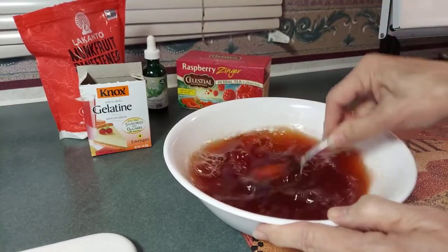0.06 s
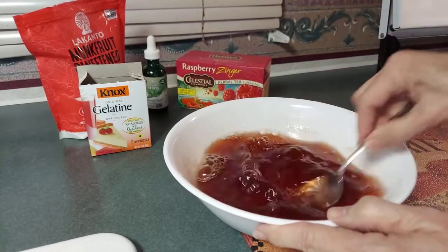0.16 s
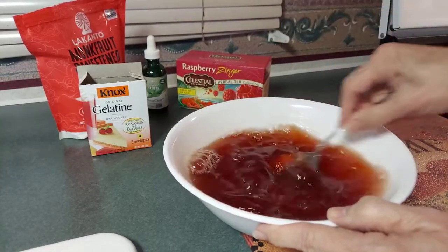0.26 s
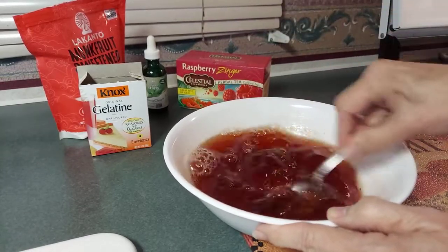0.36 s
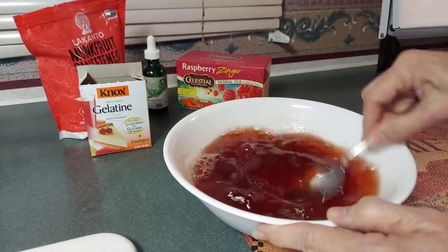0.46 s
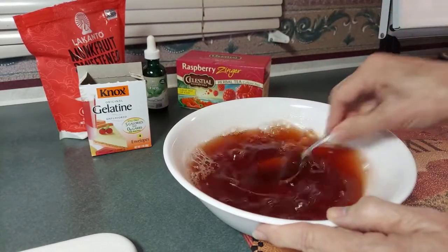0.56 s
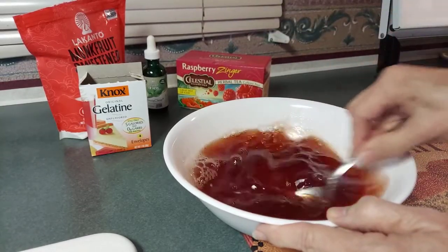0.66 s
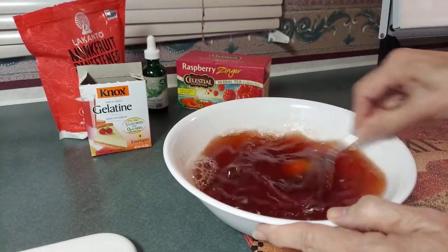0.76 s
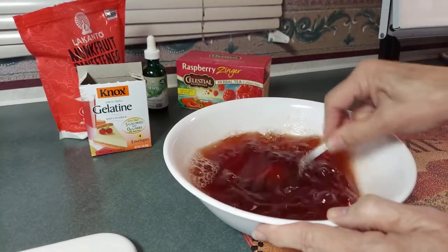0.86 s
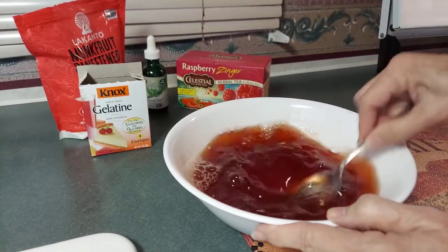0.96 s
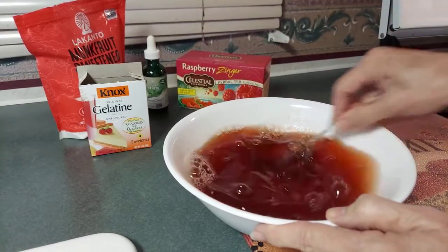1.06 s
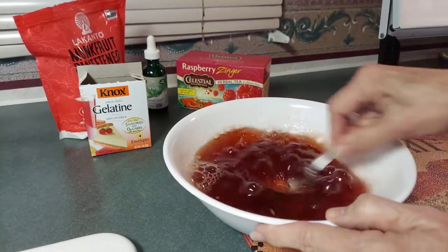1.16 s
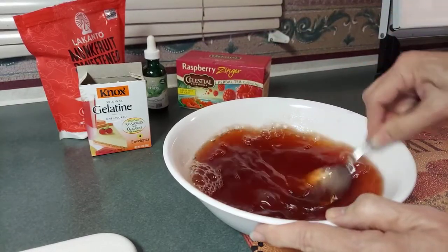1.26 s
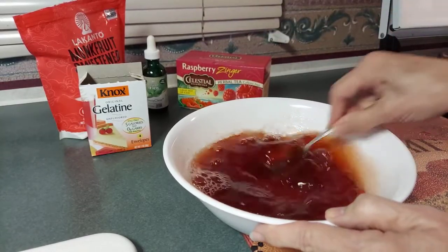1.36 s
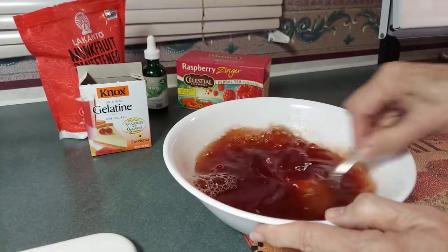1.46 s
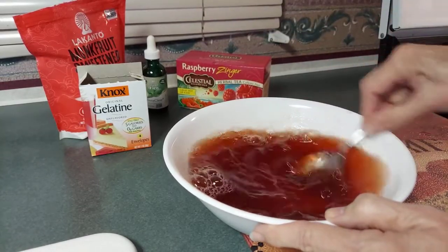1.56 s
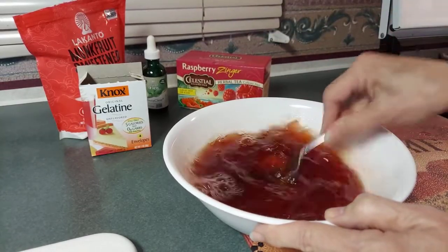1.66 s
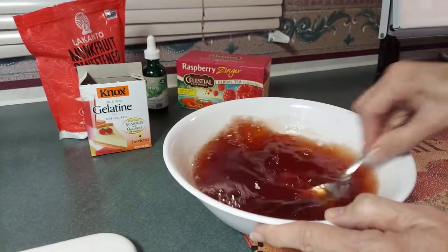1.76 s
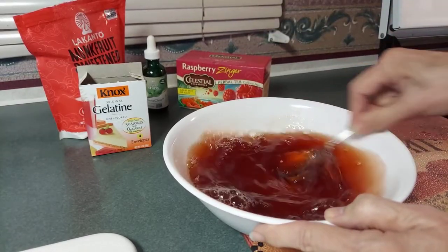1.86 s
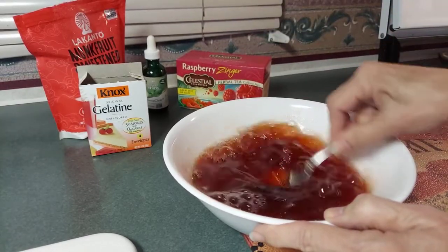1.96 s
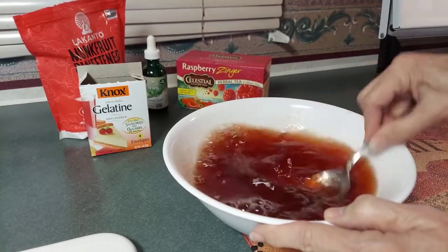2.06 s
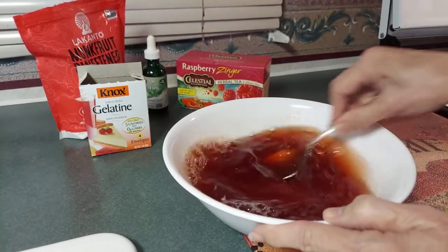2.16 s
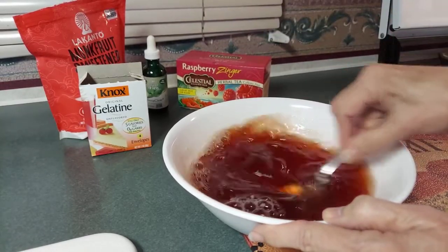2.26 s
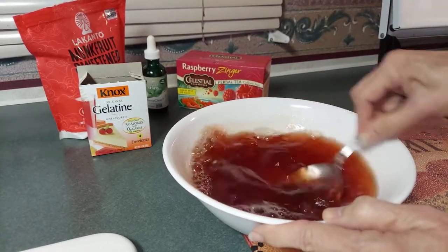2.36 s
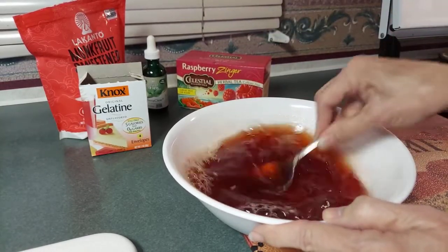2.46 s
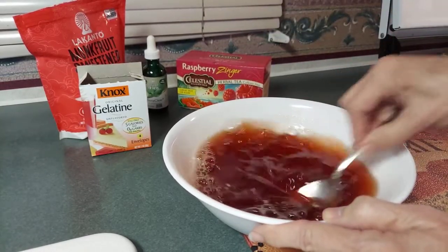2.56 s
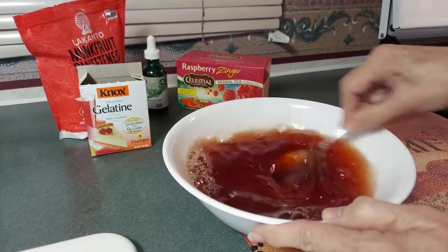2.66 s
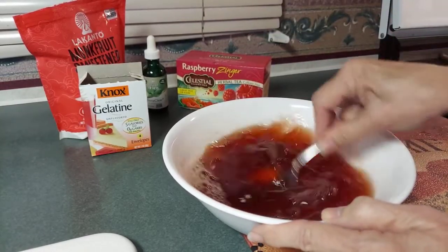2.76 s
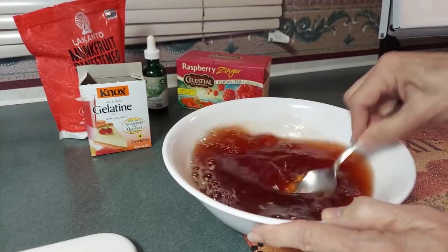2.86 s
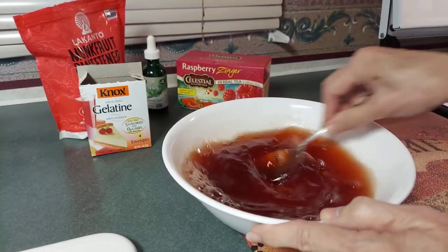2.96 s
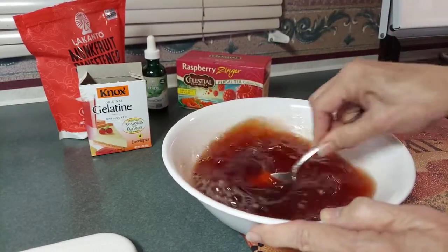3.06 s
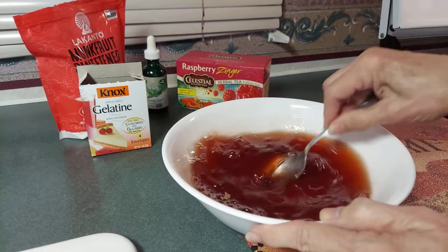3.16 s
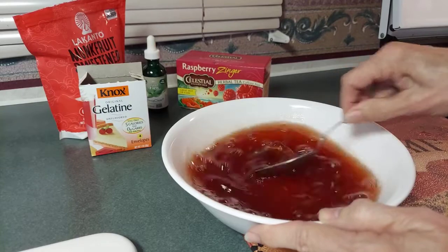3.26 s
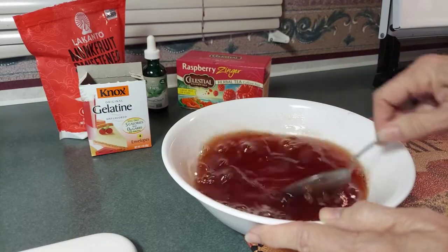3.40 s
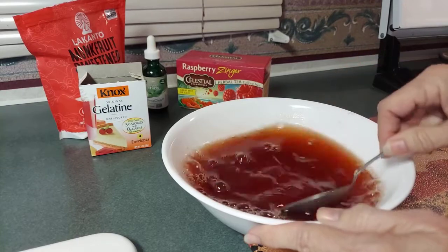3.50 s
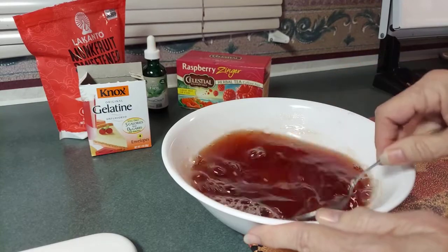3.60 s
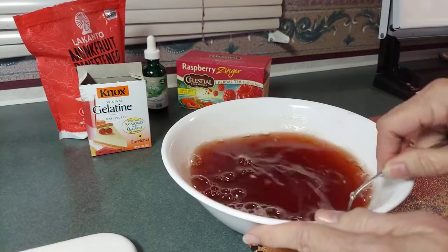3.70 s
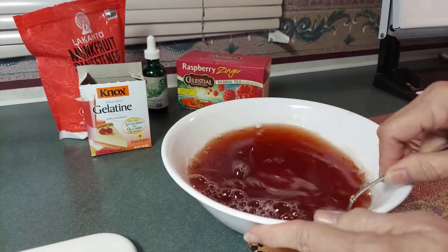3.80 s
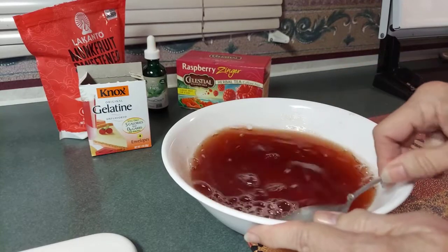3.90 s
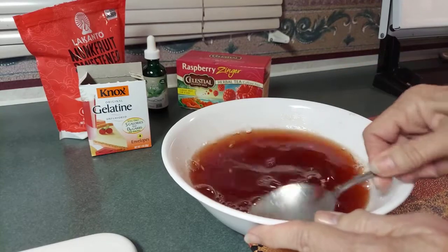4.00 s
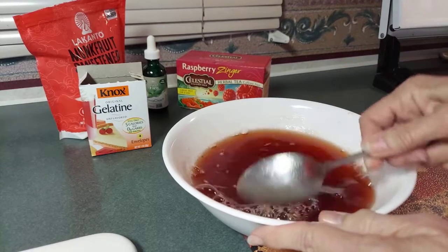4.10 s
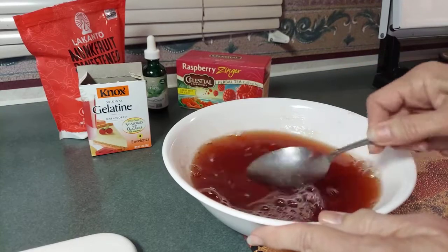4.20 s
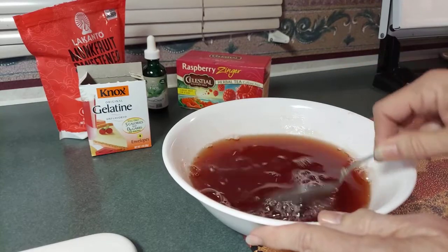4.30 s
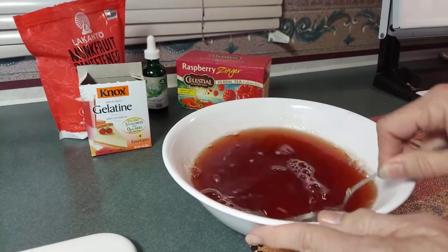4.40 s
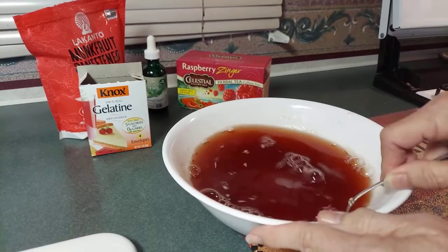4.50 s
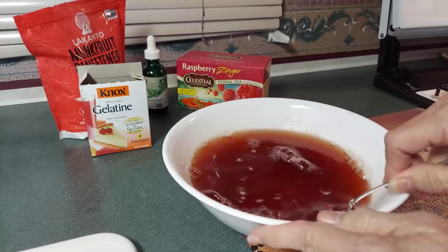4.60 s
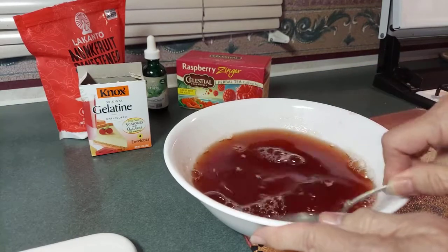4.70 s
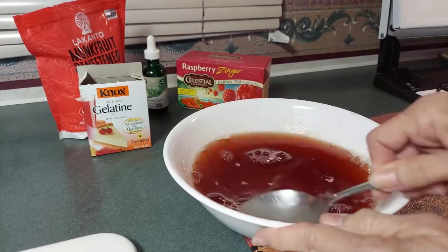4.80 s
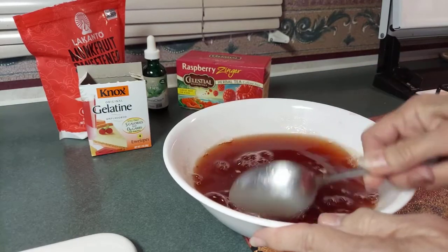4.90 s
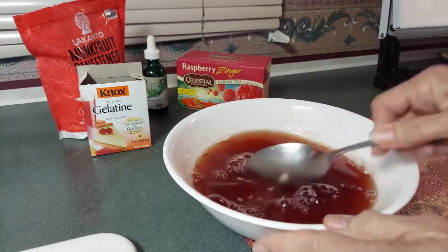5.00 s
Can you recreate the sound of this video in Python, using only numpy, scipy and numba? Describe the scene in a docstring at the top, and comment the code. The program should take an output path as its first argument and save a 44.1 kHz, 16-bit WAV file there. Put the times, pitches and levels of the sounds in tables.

```python
"""A metal spoon stirs liquid briskly in a hand-held ceramic bowl on a kitchen counter, then skims it gently.
Each sweep is grainy friction that rings the liquid-damped modes of the bowl; sharp onsets strike the same modes.
Gliding tones are trapped bubbles; filtered noise bursts are spray and droplets.
The bowl rocks with dull juddering thuds; mains hum and a faint cricket lie behind it in a small room."""
import sys
import numpy as np
from scipy import signal
from scipy.fft import rfft, irfft
from scipy.io import wavfile
from scipy.ndimage import uniform_filter1d
from numba import njit

SR = 44100
rng = np.random.default_rng(int(sys.argv[2]) if len(sys.argv) > 2 else 0)


def output_pcm(signal):
    """Save a mono or channel-first signal as 16-bit PCM at the path in sys.argv[1].

    Samples are clipped to [-1, 1] before scaling.
    """
    pcm = np.clip(np.atleast_2d(signal).T, -1, 1) * 32767
    wavfile.write(sys.argv[1], SR, np.round(pcm).astype(np.int16))


N = 222521
TIME = np.arange(N) / SR
# Sign of the left and the right side.
SIDES = np.array([[1], [-1]])


def undb(db):
    """Decibels to gain."""
    return 10 ** (np.asarray(db) / 20)


def unit(x):
    """Scale to rms 1."""
    return x / np.sqrt(np.mean(x ** 2))


def add(track, s, sound):
    """Mix a sound into a track at time s."""
    i = max(int(s * SR), 0)
    track[i:i + len(sound)] += sound[:max(N - i, 0)]


def colour(x, points, size=8192):
    """Causal minimum-phase filter through (Hz, dB) points, interpolated over log frequency."""
    hz, db = np.transpose(points)
    bin_hz = np.fft.rfftfreq(size, 1 / SR)
    log_gain = np.log(undb(np.interp(np.log(bin_hz + 1), np.log(hz), db)))
    fold = np.r_[1, np.full(size // 2 - 1, 2), np.zeros(size // 2)]
    cepstrum = irfft(log_gain) * fold
    return signal.fftconvolve(x, irfft(np.exp(rfft(cepstrum))))[:len(x)]


def walk(rate_hz):
    """Smooth random wander around 0, spread near 1."""
    k = int(SR / rate_hz)
    steps = np.repeat(rng.standard_normal(N // k + 1), k)
    return uniform_filter1d(steps, k)[:N]


def swell(s, rise_s, fall_s, edge=1.14):
    """A push that builds up to time s and lets go."""
    d = TIME - s
    u = np.abs(d / np.where(d < 0, rise_s, fall_s))
    near, push = u < 5, np.zeros(N)
    push[near] = np.exp(-u[near] ** edge)
    return push


def grains(rate_hz, spread_db):
    """Random tiny impacts of uneven size and either sign, rms 1."""
    size = undb(spread_db * np.minimum(rng.exponential(size=N), 4))
    struck = rng.random(N) < rate_hz / SR
    return unit(struck * size * rng.choice([-1, 1], N))


def burst(decay_s, size=2048):
    """A spit of spray: a short dying hiss of unit energy."""
    spray = rng.standard_normal(size) * np.exp(-np.arange(size) / SR / decay_s)
    return spray / np.linalg.norm(spray)


@njit
def resonate(x, hz, width_hz):
    """State-variable band-pass with a moving centre, gain 1 at the centre."""
    y, band, low = np.empty(len(x)), 0., 0.
    for i in range(len(x)):
        g, k = np.tan(np.pi * hz[i] / SR), width_hz / hz[i]
        v = (band + g * (x[i] + 1e-18 - low)) / (1 + g * (g + k))
        band, low, y[i] = 2 * v - band, low + 2 * g * v, k * v
    return y


def upper(hz, split_hz=1400):
    """How far a mode belongs to the bright upper group, 0-1."""
    return 1 / (1 + (split_hz / hz) ** 8)


def stirring(front_db=0.5, flank_db=-6.5):
    """The near wall and the flanks vibrate apart; the flanks reach the two sides in opposite phase."""
    front = scraping() + splashing() + hollow()
    flank = scraping() + splashing()
    return undb(front_db) * front + undb(flank_db) * SIDES * flank


# Turns of the spoon, each a back-swing and then a push. Each row: time of the push in seconds,
# back-swing level in dB, push level in dB, spray of the back-swing in dB, spray of the push in dB.
TURNS = [(.04, -56, -50, -69, -66.5), (.275, -50, -51, -71, -65.5), (0.543, -50, -48, -66.5, -70.5),
         (.807, -52.5, -48.5, -70, -73), (1.068, -52.5, -44, -70.5, -69), (1.346, -46.5, -40.5, -66, -68),
         (1.608, -43.5, -41, -70, -59.5), (1.896, -46.5, -43, -59.5, -68.5),
         (2.162, -47, -44.5, -66, -64.5), (2.428, -48.5, -51.5, -68, -64),
         (2.687, -54.5, -47.5, -70, -63.5), (2.956, -50.5, -50.5, -66, -62.5),
         (3.194, -57, -60.5, -77, -73)]
BACK_LEAD_S = 0.14  # the back-swing comes this long before the push
# the push drags low through the liquid and is dull; the back-swing runs high along the wall and is bright
PUSH_RISE_S, PUSH_FALL_S, PUSH_BRIGHT_DB = 0.028, 0.026, -3
BACK_RISE_S, BACK_FALL_S, BACK_BRIGHT_DB = 0.037, 0.026, 6.5
DULLING_DB_PER_DB, USUAL_DB = 0.34, -46.5  # pressing harder than usual favours the low modes


def sweeps():
    """Two sweeps to a turn: rows of (s, rise s, fall s, level dB, brightness dB, spray dB); force sets the colour."""
    rows = []
    for s, back_db, push_db, back_spray_db, push_spray_db in TURNS:
        back = (s - BACK_LEAD_S, BACK_RISE_S, BACK_FALL_S, back_db, BACK_BRIGHT_DB, back_spray_db)
        push = (s, PUSH_RISE_S, PUSH_FALL_S, push_db, PUSH_BRIGHT_DB, push_spray_db)
        for when, rise, fall, db, bright_db, spray_db in (back, push):
            force_bright_db = bright_db - DULLING_DB_PER_DB * (db - USUAL_DB)
            rows.append((when, rise, fall, db, force_bright_db, spray_db))
    return [row for row in rows if row[0] > 0]


def turn_angle():
    """Where the spoon is in its circle, in radians; each push is a whole turn."""
    return 2 * np.pi * np.interp(TIME, np.transpose(TURNS)[0], np.arange(len(TURNS)))


# Modes of the filled bowl. Each row: frequency in Hz, width in Hz before the player's ring factor, level in dB.
BOWL_MODES = [(828, 35.2, 5), (932.5, 56.7, -1.5), (1054, 55, 3), (1147.3, 58, 5), (1200.8, 23, 4),
              (1400, 56, -7), (1504, 36, 2), (1677, 130, -4.5), (1744, 26, 0), (1880, 120, -4.5),
              (2040, 90, -12.5), (2854, 60, -17.5), (2910, 85, -10), (3048, 50, -9), (3168, 134, -3.5),
              (3376, 150, -10), (3644, 390, -20), (4480, 734, -29), (5510, 92, -36.5), (5756, 170, -23),
              (7070, 170, -37), (8590, 400, -33.5)]
# Modes the push favours over the back-swing, as they touch different parts of the wall.
# Each row: frequency in Hz, favour in dB.
PUSH_FAVOUR = [(843, 6), (1030, 2.5), (1190, -0.5), (1600, -5), (1900, 5), (2800, -5.5), (3200, 0),
               (3420, 7.5), (4200, -12), (5750, 9.5), (8400, 8)]


def scraping(level_db=-2.0, slosh=0.0095, swirl=0.027, lift=0.035, sag=.03, ring=0.8, place_db=2,
             climb_db=5, climb_s=0.018, rest_db=-74, flicker_db=2.0):
    """Friction rings the bowl; the liquid circles once a turn, weighs low modes down at the push, bends upper ones."""
    strokes = sweeps()
    pushes = np.array([swell(s, rise, fall) * undb(db) for s, rise, fall, db, _, _ in strokes]) ** 2
    peak_s, _, _, _, bright_db, _ = np.transpose(strokes)
    resting = undb(rest_db) * (TIME < peak_s[-1])
    swing, pushing = np.sin(turn_angle()), np.cos(turn_angle())
    favour_hz, favour_db = np.transpose(PUSH_FAVOUR)
    # the spoon climbs the wall during a sweep, so the ring shifts from the low modes to the high ones
    current_peak_s = peak_s @ pushes / (pushes.sum(axis=0) + 1e-30)
    height = np.tanh((TIME - current_peak_s) / climb_s)
    friction, depth = grains(rate_hz=1200, spread_db=4.0), walk(25)
    low_bend = lift * height * np.maximum(pushing, 0) + sag * (1 - pushing) / 2
    body, power = np.zeros(N), 0
    for k, (hz, width_hz, db) in enumerate(BOWL_MODES):
        high = upper(hz)
        weight_db = bright_db * high + place_db * rng.uniform(-2.75, 2.46, len(strokes))
        climb_tilt_db = climb_db * height * min(np.log2(hz / 1250), .5)
        tilt_db = climb_tilt_db + np.interp(hz, favour_hz, favour_db) * pushing
        force = np.sqrt(undb(2 * weight_db) @ pushes) * undb(tilt_db + flicker_db * walk(45)) + resting
        bend = slosh * (depth + walk(18)) + swirl * high * swing + (1 - high) * low_bend
        body += (-1) ** k * undb(db) * resonate(friction * force, hz * (1 + bend), ring * width_hz)
        # the low group alone sets the scale
        power += undb(2 * db) * np.pi * ring * width_hz / SR * (1 - high)
    return undb(level_db) * body / np.sqrt(power)


# Spray spectrum. Each row: frequency in Hz, gain in dB.
SPRAY_COLOUR = [(200, -12), (500, -26), (800, -2), (1800, -9), (2500, -11.5), (3300, -3), (4200, -3.5),
                (5000, -5.5), (5800, -3), (7000, -7.5), (10000, -11.5), (15000, -17.5)]


def splashing(level_db=2.0, spray_s=0.0022, patchy_db=2, band_db=4.0, rest_db=-78, count=7):
    """Each sweep tears the surface into crackle; drops of each size tick in their own band at their own moments."""
    force = np.sqrt(sum((swell(s, rise, fall) * undb(db)) ** 2 for s, rise, fall, _, _, db in sweeps()))
    force = force + undb(rest_db) * (TIME < TURNS[-1][0])
    edges_hz = np.geomspace(1200, 16000, count + 1)
    spray = 0
    for band_hz in zip(edges_hz, edges_hz[1:]):
        impacts = grains(rate_hz=540, spread_db=5.5) ** 2
        drops = signal.lfilter([1], [1, -np.exp(-1 / (SR * spray_s))], impacts)
        bandpass = signal.butter(2, band_hz, "bandpass", fs=SR, output="sos")
        crackle = signal.sosfilt(bandpass, np.sqrt(drops) * rng.standard_normal(N))
        spray = spray + crackle * undb(band_db * walk(45))
    return undb(level_db + patchy_db * walk(60)) * unit(colour(spray, SPRAY_COLOUR)) * force


def hollow(level_db=-5, centre_hz=1600, swing_octaves=.3, lag_rad=1.3, wander_octaves=0.077,
           width_hz=35, late_s=0.0071):
    """The hollow behind the spoon opens and closes once a turn, so its watery note glides down and up."""
    force = np.sqrt(sum((swell(s + late_s, rise, fall) * undb(db)) ** 2 for s, rise, fall, db, _, _ in sweeps()))
    octaves = swing_octaves * np.cos(turn_angle() - lag_rad) + wander_octaves * walk(22)
    note = resonate(grains(rate_hz=500, spread_db=2.5), centre_hz * 2 ** octaves, float(width_hz))
    return undb(level_db) * force * unit(note)


# Sharp onsets: knocks, scrapes that catch, and the crack of a plop.
# Each row: start in seconds, level in dB, brightness in dB, click in dB.
ONSETS = [(.135, -37.5, 2, -16), (0.166, -35.5, 8, -1), (.264, -36, -20, -25.5), (0.376, -36.5, -16, -29),
          (.412, -36, 11, 3.5), (0.515, -41, -35, -24), (1.182, -31.5, 9, -11), (1.255, -44.5, 0, 5),
          (1.326, -35, -8, -18), (1.4024, -36, 17.5, 5), (1.568, -20.5, -26, 3), (1.609, -29.5, 4.5, -27),
          (1.723, -37, 8.5, -5), (1.867, -34.5, 4, -29), (1.98, -36, 4, -5), (2.113, -48, -4, 5),
          (2.148, -33, -31, -18), (2.514, -44, 28, -20.5), (2.540, -18.5, 14, -2.5), (2.679, -30, -6, -17),
          (2.826, -23.5, 13, -2), (2.875, -38, 12.5, 2), (3.064, -24.5, 8, -7.5), (3.144, -38, 6, 4.5),
          (3.706, -54, -5.5, -21.5), (4.178, -60.5, -11.5, -23.5), (4.501, -58, -25, -19.5),
          (4.812, -52.5, -14, -22), (4.888, -61.5, 0, -14)]
# Click spectrum. Each row: frequency in Hz, gain in dB.
CLICK_COLOUR = [(300, -21.5), (1000, -4.5), (3000, 7.5), (5500, 2.5), (8000, -2.5), (11000, -9.5),
                (15000, -8.5)]


def sharp_onsets(ring=0.67, detune=0.0086, crack_s=0.005, crack_db=-3, size=8192):
    """Knocks, scrapes that catch, and the crack of a plop: a noise click, each with a short bowl ring."""
    out, blow = np.zeros(N), signal.unit_impulse(size)
    for s, db, bright_db, click_db in ONSETS:
        body = np.zeros(size)
        for k, (hz, width_hz, mode_db) in enumerate(BOWL_MODES):
            tuned_hz = np.full(size, hz * (1 + detune * rng.standard_normal()))
            gain = (-1) ** k * undb(mode_db + bright_db * upper(hz, split_hz=2170))
            body += gain * resonate(blow, tuned_hz, ring * width_hz)
        crack = colour(burst(crack_s, size=size), CLICK_COLOUR)
        crack = undb(click_db + crack_db) * crack / np.abs(crack).max()
        add(out, s, undb(db) * (body / np.abs(body).max() + crack))
    return out


def bubble(first_hz, last_hz, length_s, attack_cycles=1.8, damping=0.74, wobble=0.035, ragged=0.36,
           froth_db=-13, wobble_cycles=3):
    """An air pocket rings, wobbles every few cycles and glides as it nears the surface; froth roughens the tone."""
    u = np.arange(int(2 * length_s * SR)) / (length_s * SR)
    span, cycle = int(wobble_cycles * SR / first_hz), int(SR / first_hz)
    noise = rng.standard_normal((2, len(u)))
    shape, strength = uniform_filter1d(uniform_filter1d(noise, span), span) * np.sqrt(span)
    glide_hz = first_hz + (last_hz - first_hz) * np.minimum(u, 1.1)
    phase = 2 * np.pi * np.cumsum(glide_hz * (1 + wobble * shape)) / SR
    froth = uniform_filter1d(uniform_filter1d(rng.standard_normal(len(u)), 2 * cycle), cycle) * np.sqrt(2 * cycle)
    tone = np.sin(phase) * (1 + ragged * strength) + undb(froth_db) * froth * np.cos(phase)
    attack = 1 - np.exp(-(u * length_s * first_hz / attack_cycles) ** 2)
    return tone * attack * np.exp(-damping * u - 2 * u ** 5.9)


# The most prominent bubbles, from deep plops to a tiny foam pop. Each row: start in seconds,
# first pitch in Hz, rise in octaves, ring time in seconds, level in dB.
BUBBLES = [(0.054, 1280, 1.03, 0.029, -41.5), (0.186, 444, 0.93, 0.054, -53), (.234, 1510, 1.15, .016, -28),
           (0.24, 1750, 0.38, 0.011, -37), (.25, 2650, 0.44, 0.013, -45), (0.385, 2110, 0.36, 0.016, -39),
           (.389, 1014, -0.13, .022, -34.5), (.411, 2840, 0.04, .008, -35), (0.65, 1640, 0.17, 0.011, -37),
           (.701, 674, -0.061, 0.033, -42.5), (.7025, 2270, .12, 0.0065, -35.5),
           (.897, 1600, -0.021, 0.01, -38.5), (1.068, 1710, 0.32, 0.016, -41),
           (1.364, 3040, .043, 0.011, -32.5), (1.393, 1580, 0.85, .014, -37),
           (1.403, 2150, 0.12, 0.016, -33.5), (1.551, 3090, -0.36, .007, -36),
           (1.5666, 879, 0.43, 0.019, -18.5), (1.582, 1486, .6, .016, -26.5),
           (1.585, 1150, 0.38, 0.022, -32), (1.61, 1100, .1, 0.023, -33.5), (1.621, 1900, .15, 0.0078, -46),
           (1.649, 3170, 0.071, .01, -35), (1.670, 2680, 0.61, 0.0039, -37),
           (2.302, 2100, .37, 0.0096, -35.5), (2.795, 1482, .4, 0.034, -42.5),
           (2.938, 637, 0.11, .05, -47.5), (2.977, 2380, -0.21, .007, -51),
           (3.108, 2095, 0.25, 0.0082, -46), (3.322, 1000, 1.08, 0.036, -65.5),
           (3.6372, 8960, -0.028, 0.0015, -38.5), (4.501, 1448, 0.072, 0.015, -54)]


def prominent_bubbles():
    """The most prominent bubbles, deep plops to a tiny foam pop, ring and glide, some overlapping."""
    out = np.zeros(N)
    for s, hz, octaves, length_s, db in BUBBLES:
        add(out, s, undb(db) * bubble(hz, hz * 2 ** octaves, length_s))
    return out


def burbling(level_db=-2, centre_hz=1600, spread_octaves=.75, spread_db=4, cycles=17, glide_octaves=.25,
             rise_octaves_per_s=7, bright_octaves_per_db=.035, count=11):
    """Small chirping bubbles in every sweep, rising in pitch as the spoon nears the surface."""
    out = np.zeros(N)
    for s, rise, fall, db, bright_db, _ in sweeps():
        for when, pitch, strength, glide in rng.uniform(-1, 1, (count, 4)):
            late_s = when * (rise if when < 0 else fall)
            octaves = spread_octaves * pitch + rise_octaves_per_s * late_s + bright_octaves_per_db * bright_db
            hz = centre_hz * 2 ** octaves
            # smaller bubbles are higher and fainter
            gain = undb(db + level_db + spread_db * strength) * min(centre_hz / hz, 1)
            add(out, s + late_s, gain * bubble(hz, hz * 2 ** (glide_octaves * (1 + glide)), cycles / hz))
    return out


def fizz(level_db=-4.5, centre_hz=4200, spread_octaves=1.1, spread_db=6, cycles=13, count=36):
    """The spray of every sweep traps a cloud of tiny bubbles, each with its own short ping."""
    out = np.zeros(N)
    for s, rise, fall, _, _, spray_db in sweeps():
        for when, pitch, strength in rng.uniform(-1.1, 1, (count, 3)):
            hz = centre_hz * 2 ** (spread_octaves * pitch)
            late_s = (rise if when < 0 else fall) * 1.2 * when * abs(when)
            gain = undb(spray_db + level_db + spread_db * strength)
            add(out, s + late_s, gain * bubble(hz, hz, cycles / hz))
    return out


# The largest droplets. Each row: start in seconds, level in dB, pitch of the tick in Hz.
DROPLETS = [(0.2847, -42.5, 9050), (0.6491, -43, 4750), (.672, -54, 6030), (0.6846, -36.5, 5200),
            (0.8977, -42.5, 12100), (1.3418, -36, 13000), (1.3635, -39, 11500), (1.3836, -40, 6560),
            (1.4027, -31, 6700), (1.5502, -29.5, 4700), (1.8861, -35.5, 5960), (1.9911, -30.5, 4295),
            (2.5287, -51, 6200), (2.733, -38.5, 5700), (2.887, -47, 14600), (3.2193, -53.5, 10960),
            (3.2529, -54, 9020), (3.4228, -60, 9610), (3.9665, -57, 8520), (4.4262, -60.5, 8450),
            (4.556, -59.5, 8000)]


def dripping(tick_db=10, tick_s=0.00061, width_ratio=.4, splat_db=3, splat_s=0.0038):
    """A droplet lands with a sharp tick at its own pitch and a short broad splat."""
    out = np.zeros(N)
    for s, db, hz in DROPLETS:
        hit = burst(tick_s)
        tick = resonate(hit, np.full(len(hit), float(hz)), width_ratio * hz)
        tick = undb(tick_db) * tick / np.linalg.norm(tick)
        add(out, s, undb(db) * (tick + undb(splat_db) * burst(splat_s)))
    return out


RISE_SHARE = 0.436  # part of a thud or a skim spent building up


def nudge(s, length_s):
    """A brief push of a given length that peaks at time s."""
    return swell(s, RISE_SHARE * length_s, (1 - RISE_SHARE) * length_s)


# Slow skimming along the wall. Each row: peak in seconds, length in seconds, level in dB, brightness in dB.
SKIMS = [(3.724, 0.045, -64.5, -15.5), (3.913, 0.051, -72.5, -1), (4.093, 0.083, -73.5, 10),
         (4.198, 0.04, -71, -1.5), (4.58, 0.026, -78.5, 5.5), (4.618, 0.033, -76, 9),
         (4.745, 0.067, -63.5, -0.5), (4.812, 0.089, -64, -28), (4.897, 0.057, -75, 13)]
# Rub spectrum. Each row: frequency in Hz, gain in dB.
SKIM_COLOUR = [(150, -15), (330, -12.5), (520, 1), (850, 14.5), (1100, -11), (1500, -4.5), (2000, -4),
               (2600, -8), (3200, -13), (4000, -3), (5300, -7), (7000, -3), (9500, -5), (15000, -29.5)]
# Modes of the spoon. Each row: frequency in Hz, width in Hz, level in dB.
SPOON_MODES = [(1450, 120, 9.2), (2058, 130, 15.5), (2550, 130, 10.4), (3130, 160, 17), (4576, 210, 7),
               (5130, 180, 5.5)]


def skimming(ring_db=2, rough_db=2.0, dip=0.03):
    """The spoon slides lightly along the wall in fits and starts; its own modes ring and shift as it dips and lifts."""
    rub = colour(grains(rate_hz=800, spread_db=2.0), SKIM_COLOUR) * undb(rough_db * walk(90))
    ring = sum(undb(db) * resonate(rub, hz * (1 + dip * walk(14)), float(width_hz))
               for hz, width_hz, db in SPOON_MODES)
    rub = unit(rub + undb(ring_db) * ring)
    dull = signal.sosfilt(signal.butter(1, 2500, fs=SR, output="sos"), rub)
    out = np.zeros(N)
    for s, length_s, db, bright_db in SKIMS:
        out += nudge(s, length_s) * undb(db) * (dull + undb(bright_db) * (rub - dull))
    return out


# The bowl rocking on the counter. Each row: peak in seconds, length in seconds, level in dB,
# judder in Hz, overtone in dB, counter knock in dB, the last two relative to the level.
THUDS = [(1.186, 0.033, -36.5, 100.8, -15, -22.5), (1.216, 0.029, -28.5, 112.6, -24.5, -26.5),
         (1.732, 0.03, -37, 118.2, -25, -27), (1.986, 0.05, -40.5, 95.5, -15, -24.5),
         (2.028, 0.02, -45.5, 124.9, -10, -7), (2.059, 0.036, -32.5, 107.9, -24, -32),
         (2.26, 0.045, -37, 108.2, -40.5, -39), (2.812, 0.17, -50, 118.7, -16.5, -33),
         (3.729, 0.033, -54.5, 112.3, -5.5, -19), (3.872, 0.035, -52, 112.8, -24, -31),
         (3.991, 0.07, -39, 121.1, -17.5, -34), (4.114, 0.055, -59, 119.4, -11, -19.5),
         (4.213, 0.0607, -43.5, 100.3, -21, -34.5), (4.76, 0.05, -48, 111.5, -2, -26.5),
         (4.807, 0.032, -37, 105.7, -4.5, -27.5), (4.84, 0.034, -35, 117.6, -9, -28),
         (4.905, 0.026, -35.5, 111.3, -12, -25.5), (4.955, 0.024, -41, 103.8, -15.5, -35)]
# Thud spectrum. Each row: frequency in Hz, gain in dB.
THUD_COLOUR = [(30, -28.5), (70, -5), (105, -7.5), (135, 2.5), (165, -19.5), (225, -14), (280, -22),
               (420, -38), (800, -67.5)]
# Rattle spectrum. Each row: frequency in Hz, gain in dB.
RATTLE_COLOUR = [(100, -50.5), (170, 5.5), (230, 5), (275, 0), (330, -2.5), (450, -28), (900, -49)]


def rocking(waver=0.0519, rough_db=-13, octave_db=1, rattle_db=-6, counter_hz=400, counter_width_hz=45,
            pan_db=5, lag_rad=0.125):
    """The bowl's foot judders on its mat; some judders, loud or faint, also buzz and make the counter top knock."""
    _, _, _, judder_hz, overtone_db, knock_db = np.transpose(THUDS)
    pushes = np.array([nudge(s, length_s) * undb(db) for s, length_s, db, *_ in THUDS]) + 1e-12
    force, overtone = pushes.sum(axis=0), undb(overtone_db) @ pushes
    pitch_hz = judder_hz @ pushes / force * (1 + waver * walk(30))
    phase = 2 * np.pi * np.cumsum(pitch_hz) / SR + lag_rad * SIDES / 2
    rough = np.array([unit(colour(rng.standard_normal(N), THUD_COLOUR)) for _ in SIDES])
    rattle = np.array([unit(colour(rng.standard_normal(N), RATTLE_COLOUR)) for _ in SIDES])
    judder = force * (1.085 * np.sin(phase) + undb(rough_db) * rough)
    counter = resonate(grains(rate_hz=250, spread_db=6.0), np.full(N, float(counter_hz)), float(counter_width_hz))
    knock = (undb(knock_db) @ pushes) * unit(counter)
    buzz = overtone * (undb(octave_db) * np.sin(2 * phase) + undb(rattle_db) * rattle)
    return (judder + knock + buzz) * undb(pan_db * SIDES / 2)


def churning(level_db=-63):
    """The swirling liquid and the arm keep the counter rumbling until the brisk stirring ends."""
    rumble = unit(colour(rng.standard_normal(N), THUD_COLOUR))
    return undb(level_db) * rumble * np.interp(TIME, [3.05, 3.3], [1, 0])


# Wall and surface spectra on each side. Each row: frequency in Hz, gain in dB.
LEFT_COLOUR = [(100, -16), (700, -3), (1300, 4.5), (2400, -1), (4400, 2.5), (8000, -16), (15000, -10.5)]
RIGHT_COLOUR = [(100, 8), (700, -1.5), (1300, 2.5), (2400, 4), (4400, 6.5), (8000, 2), (15000, 0.5)]
# Echo spectrum. Each row: frequency in Hz, gain in dB.
ROOM_COLOUR = [(100, -10), (600, 5), (1500, -3), (4000, -4), (9000, 2), (15000, -1.5)]


def kitchen(sound, early_db=-7, early_s=0.0098, tail_db=-11, t60_s=0.23, treble_t60_s=0.19, treble_hz=5000,
            left_direct_db=-3.5, right_direct_db=-1.0, left_lag_s=.0001):
    """Bowl and counter reflect at once, the room lingers, its treble less; the left is later and shaded in treble."""
    t, out = TIME[:SR // 2], []
    sides = ((LEFT_COLOUR, left_direct_db, left_lag_s), (RIGHT_COLOUR, right_direct_db, 0))
    lowpass = signal.butter(2, treble_hz, fs=SR, output="sos")
    fade, treble_fade = (np.exp(-np.log(1000) * t / s) for s in (t60_s, treble_t60_s))
    for x, (side_colour, direct_db, lag_s) in zip(sound, sides):
        early = rng.standard_normal(len(t)) * np.exp(-t / early_s) * (t > .0006)
        wash = rng.standard_normal(len(t)) * (t > .006)
        low = signal.sosfiltfilt(lowpass, wash)
        tail = (low * fade + (wash - low) * treble_fade) / np.linalg.norm(wash * fade)
        echo = colour(undb(early_db) * early / np.linalg.norm(early) + undb(tail_db) * tail, ROOM_COLOUR)
        echo[int(lag_s * SR)] += undb(direct_db)  # the direct path
        out.append(colour(signal.fftconvolve(x, echo)[:N], side_colour))
    return np.array(out)


# Cricket chirps: starts in seconds.
CHIRPS = [3.227, 3.648, 4.073, 4.517, 4.959]


def cricket(hz=4500, sag_hz=170, waver=0.014, level_db=-78, grow_db=3.5, period_s=.0485, stroke_s=.034,
            wet_db=-3, decay_s=0.05, count=3):
    """A far cricket: three wing strokes that grow louder, each sagging in pitch and lingering in the room."""
    out, u = np.zeros(N), np.arange(int(stroke_s * SR)) / (stroke_s * SR)
    for s in CHIRPS:
        for k in range(count):
            pitch_hz = (hz - sag_hz * u ** 2) * (1 + waver * walk(400)[:len(u)])
            stroke = np.sin(np.pi * u) ** 2 * np.sin(2 * np.pi * np.cumsum(pitch_hz) / SR)
            add(out, s + k * period_s, undb(level_db + grow_db * k) * stroke)
    wet = np.array([signal.fftconvolve(out, burst(decay_s, size=16384))[:N] for _ in SIDES])
    return out + undb(wet_db) * wet


# Mains hum. Each row: frequency in Hz, level in dB rms before panning.
HUM = [(59.3, -57.5), (118.5, -63), (237, -92.5)]
# Rumble spectrum. Each row: frequency in Hz, gain in dB.
RUMBLE_COLOUR = [(20, -22.5), (35, -19.5), (50, 5.5), (75, 0.5), (110, 0.5), (160, -18.5), (250, -17.5),
                 (500, -42)]
# Hiss spectrum. Each row: frequency in Hz, gain in dB.
AIR_COLOUR = [(150, -30), (250, -1.5), (263, -15.5), (313, -10), (576, -25), (2490, -28.5), (5930, -33),
              (7310, -30.5), (16000, -37.5)]


def background(rumble_db=-66, hum_pan_db=-4.0, air_db=-77.24):
    """An appliance hums and rumbles under a thin hiss."""
    hum = np.zeros(N)
    for hz, db in HUM:
        hum += np.sqrt(2) * undb(db + walk(1.4)) * np.sin(2 * np.pi * (hz * TIME + rng.random()))
    rumble = undb(rumble_db) * unit(colour(rng.standard_normal(N), RUMBLE_COLOUR))
    hiss = np.array([unit(colour(rng.standard_normal(N), AIR_COLOUR)) for _ in SIDES])
    return (hum + rumble) * undb(hum_pan_db * SIDES / 2) + undb(air_db) * hiss


def scene():
    """Wall and liquid surface each have their own paths through the kitchen; the counter carries the lows."""
    wall = kitchen(stirring() + sharp_onsets() + skimming())
    liquid = prominent_bubbles() + burbling() + dripping() + fizz()
    surface = kitchen(np.tile(liquid, (2, 1)))
    return wall + surface + rocking() + churning() + cricket() + background()


def record(dry, top_hz=15900):
    """A steep elliptic low-pass cuts the top."""
    return signal.sosfilt(signal.ellip(8, .2, 70, top_hz, fs=SR, output="sos"), dry)


dry = scene()
out = record(dry)
output_pcm(out)
```